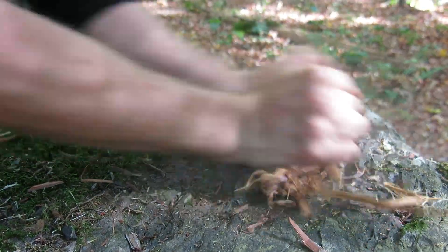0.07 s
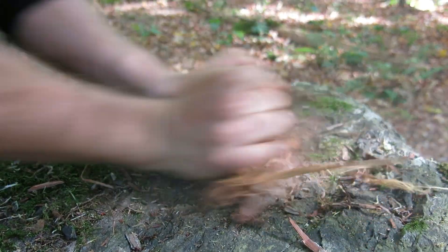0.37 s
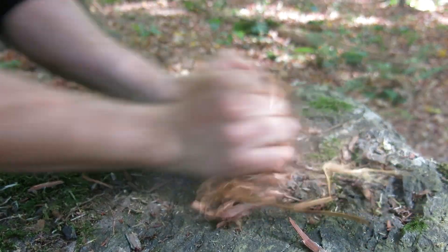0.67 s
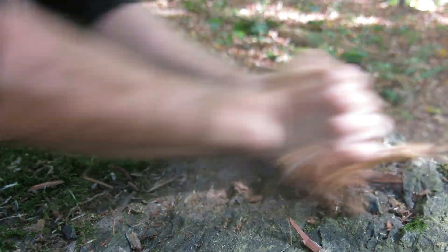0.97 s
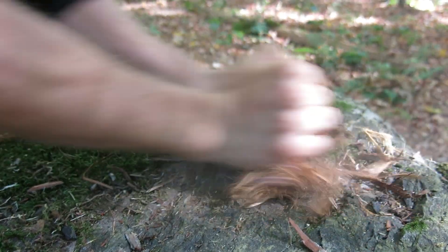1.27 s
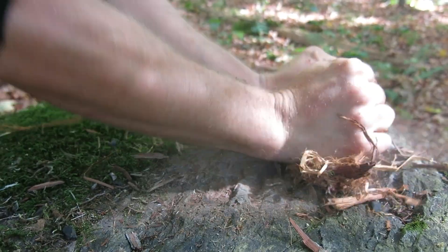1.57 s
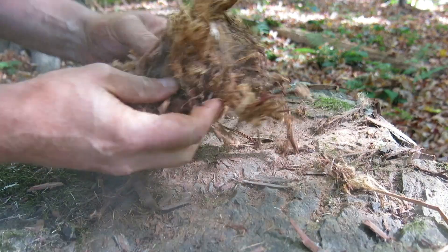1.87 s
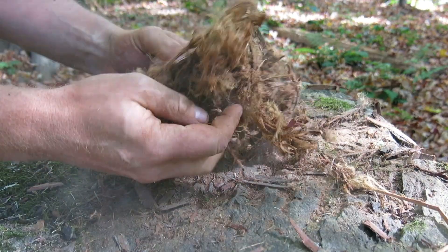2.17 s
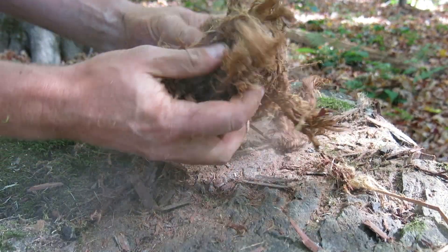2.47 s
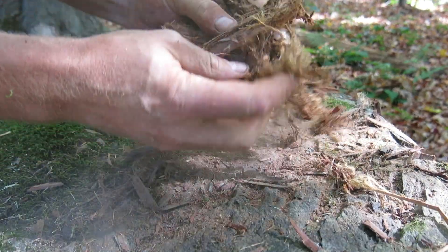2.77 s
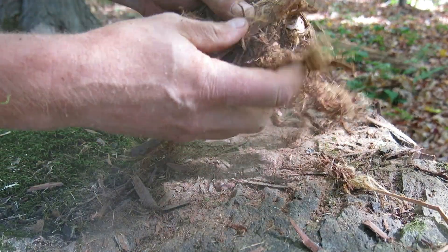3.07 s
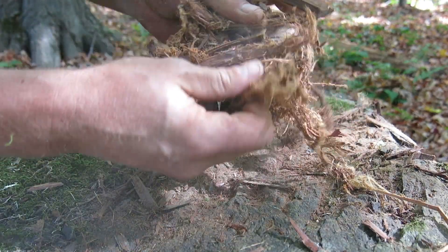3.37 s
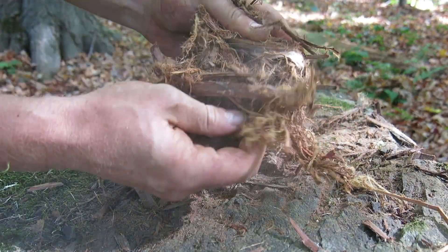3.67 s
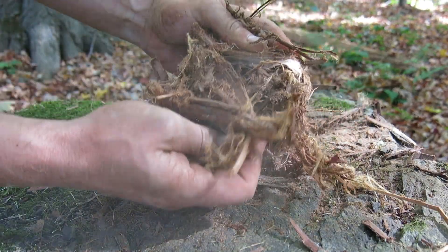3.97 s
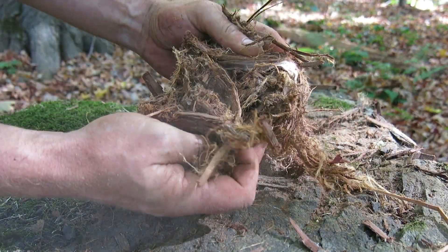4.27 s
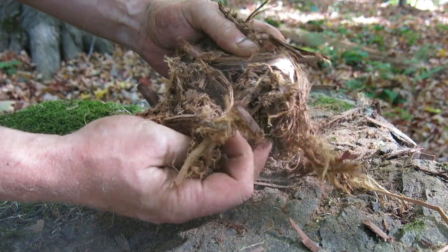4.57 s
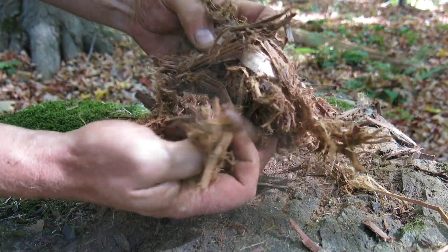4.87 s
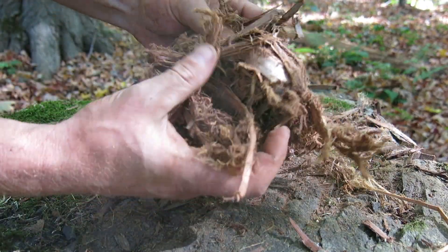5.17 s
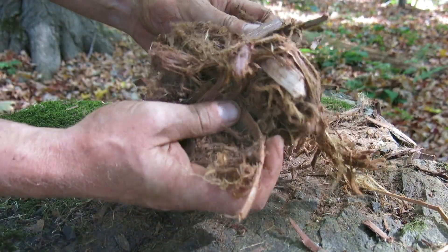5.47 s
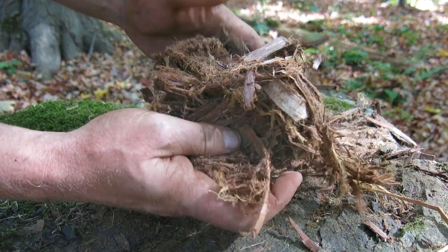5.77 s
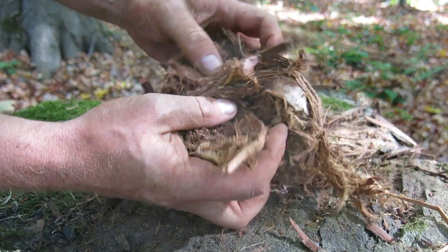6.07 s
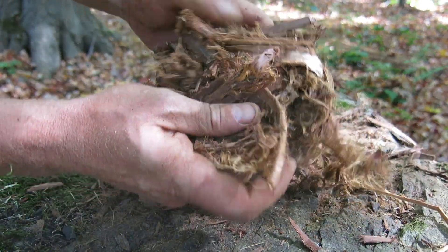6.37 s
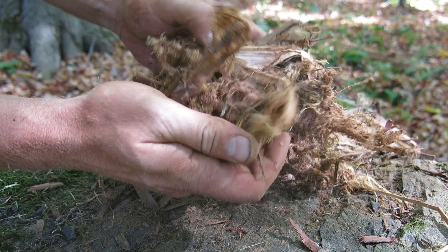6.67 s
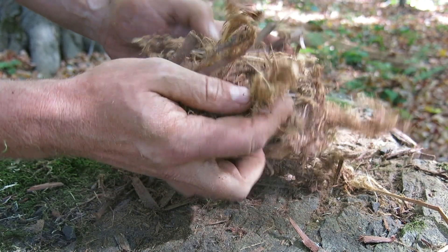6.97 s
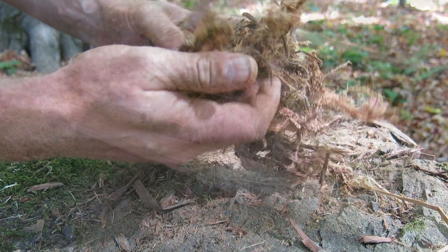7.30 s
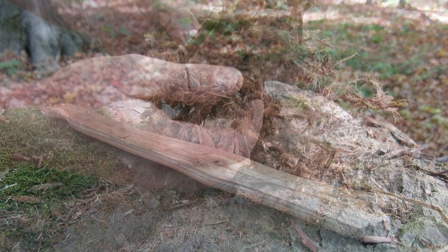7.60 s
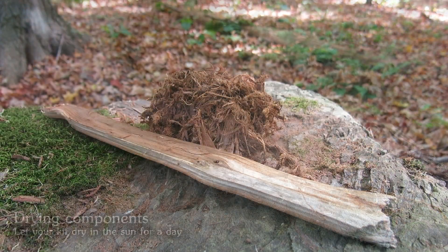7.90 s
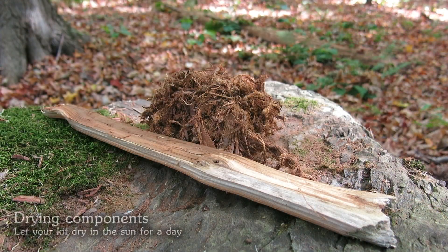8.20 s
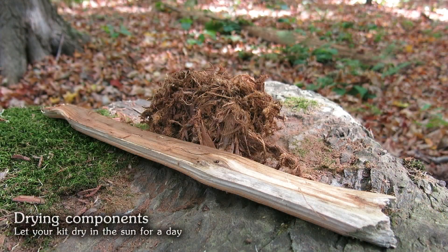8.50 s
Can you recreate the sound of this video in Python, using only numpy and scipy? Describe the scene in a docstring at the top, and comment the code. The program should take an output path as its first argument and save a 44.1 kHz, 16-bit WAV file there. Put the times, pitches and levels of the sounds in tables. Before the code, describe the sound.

Fists scrub dry bark hard against a log, then fingers tease the crackling fibres apart under a distant aircraft-like roar in a forest.

```python
"""Dry bark rasps to and fro on a log, scrubbed by two fists four times a second, and strands snap.
Stick-slip friction excites the wood and the fibres; each fracture radiates a short pulse.
The scene changes abruptly: hands tease the loosened fibres apart in a fine crackle under a distant roar,
like an aircraft drawing away. This fades out, and the quiet forest fades in with a faint far hum."""
import sys
import numpy as np
from scipy import signal
from scipy.fft import rfft, irfft, next_fast_len
from scipy.io import wavfile
from scipy.ndimage import map_coordinates

SR = 44100
rng = np.random.default_rng(int(sys.argv[2]) if len(sys.argv) > 2 else 0)


def master_out(mix):
    """Clip the mix to full scale and print it as 16-bit PCM to the path in sys.argv[1]."""
    frames = np.transpose(np.atleast_2d(mix))
    ceiling = np.clip(frames, -1, 1)
    pcm = np.round(ceiling * 32767).astype(np.int16)
    wavfile.write(sys.argv[1], SR, pcm)


N = 376613
TEASING_START_S, STILLNESS_START_S = 1.621, 7.702

# Spectra of the noise sources. Each row: frequency in Hz, relative spectral density in dB.
FOREST_SPECTRUM = [(24, -36), (45, -12), (75, 0), (194, -0.5), (276, -5), (770, -11), (2000, -14.5),
                   (3000, -18), (7000, -21), (16000, -32.5)]
STILL_AIR_SPECTRUM = [(18, -62), (30, -32), (60, -11), (112, -5), (165, -10), (266, -10.5), (328, -16),
                      (449, -13), (512, -16), (632, -16), (1040, -19.5), (1600, -23), (3000, -33),
                      (7000, -39), (16000, -54.5)]
RUMBLE_SPECTRUM = [(13, -50), (22, -28), (32, -26.5), (61, -7), (76, -5.5), (114, -4), (178, -3),
                   (304, -9.5), (500, -14.5), (650, -37), (1100, -120)]
RUSH_SPECTRUM = [(180, -16), (300, -6), (337, -6), (425, -8), (519, -4), (565, -4.5), (614, -4), (814, -4),
                 (978, -5), (1900, -11.5), (2700, -17.5), (4670, -21), (15200, -33), (16000, -33)]
FIBRE_SPECTRUM = [(1650, -14), (2800, -9.5), (3310, -9), (4150, 0.5), (9130, -2), (15200, -7), (16000, -20)]
THUD_SPECTRUM = [(26, -42.5), (45, -18.5), (70, -4), (172, 4.5), (317, -1), (480, 0.5), (700, -6.5),
                 (910, -29.5), (1540, -120)]
LOG_SPECTRUM = [(260, -40), (450, -9.5), (621, -12), (1000, -0.5), (1200, -5.5), (1340, -5.5), (1620, -6.5),
                (1780, -9.5), (2060, -8.5), (2350, -8), (2820, -18), (3600, -15), (4680, -44.5),
                (7920, -120)]
RASP_SPECTRUM = [(1530, -32), (2600, -4.5), (5350, -6), (6620, -3.5), (8200, -7), (10900, -7.5),
                 (14500, -12.5), (15300, -16.5), (16000, -22)]
# Partials of the far hum. Each row: frequency in Hz, mean level in dB.
HUM_PARTIALS = [(113.0, -73), (226.1, -67)]
# The deep drone in the roar. Each row: time in seconds, pitch in Hz, level in dB relative to the rush.
DRONE_TRACK = [(1.62, 78.2, 0), (1.9, 76.8, -7.5), (2.6, 76, -7), (3.7, 82, -3), (4.3, 76, -5),
               (5.3, 79, -2.5), (6.2, 85.1, -8), (7.2, 92.1, -5.5)]
# Long soft swells of noise, each in one band. Each row: crest and length in seconds, level in dB, centre and
# width in Hz.
LONG_SWELLS = [(2.8, .6, -56.5, 3600, 2200), (2.821, 0.71, -48, 1580, 500), (4.57, 0.5, -51.5, 700, 700),
               (4.622, 0.65, -54.5, 11800, 5430), (4.647, 0.7, -59.5, 4500, 1200),
               (4.52, 0.63, -59, 2380, 400), (5.67, .8, -58, 1570, 450), (5.75, 0.56, -66, 3930, 700)]
# Loose fibres shifting ever more lightly. Each row: time in seconds, relative level in dB.
RUSTLE_LEVELS = [(1.63, -46.5), (2.05, -50), (2.25, -54), (2.8, -52.5), (3.95, -65.5), (5.1, -59),
                 (6.0, -65.5), (7.28, -63), (7.5, -88)]
# Pulls of the fingers through the wad. Each row: crest and length in seconds, relative level in dB.
FINGER_PULLS = [(2.483, 0.21, -51.5), (3.257, 0.36, -52), (3.57, 0.18, -55), (4.85, .05, -53.5),
                (4.9, 0.051, -54.5), (5.14, .06, -58.5), (5.307, .08, -52), (5.47, .08, -64),
                (5.678, .07, -62), (6.16, .04, -49), (6.452, .04, -62), (6.52, .05, -60),
                (6.69, .05, -59.5), (7.22, .1, -57.5)]
# Breaking strands. Each row: start in seconds, pulse level in dB, pitch in Hz, knock level in dB.
STRAND_SNAPS = [(0.0616, -13, 3925, -17.5), (0.1155, -10.5, 6175, -37), (0.1383, -13, 1840, -22.5),
                (0.1905, -10.5, 5025, -22), (0.241, -14.5, 2206, -20.5), (0.255, -6, 5574, -14),
                (0.4449, -7, 5250, -31.5), (0.4888, -5, 6110, -17.5), (0.5567, -14.5, 5944, -30.5),
                (0.7738, -3.5, 2060, -11), (0.784, -2, 7850, -27), (1.0219, -15.5, 3920, -30.5),
                (1.1317, -10, 4000, -25.5), (1.209, -16, 1370, -20), (1.3015, -17, 3060, -21),
                (1.3122, -19, 1098, -20.5), (1.4608, -3.5, 4400, -33.5), (1.4618, -5, 3990, -31),
                (1.4627, -7, 3310, -27.5), (1.4899, -16, 11000, -20.5), (1.512, -18, 1255, -21),
                (2.1407, -30.5, 5000, -36), (4.9018, -40, 5490, -54), (5.1434, -39.5, 7300, -43),
                (5.3178, -34, 9900, -54), (5.439, -33, 4360, -33), (5.565, -32.5, 4920, -31),
                (6.1626, -36.5, 8450, -57)]
# Pushes and pulls in turn. Each row: start, crest and end in seconds, relative levels of thud, log
# and rasp in dB, resonance of the hollow under the hands in Hz.
SCRUB_STROKES = [(-0.06, 0.025, 0.12, -35, -26, -30, 994), (0.072, 0.192, 0.22, -30, -28.5, -30.5, 1084),
                 (0.203, 0.257, 0.37, -43.5, -26.5, -31.5, 1194),
                 (0.297, 0.437, 0.465, -37, -33.5, -35, 1000), (0.443, 0.519, 0.6, -38.5, -22.5, -30, 1053),
                 (0.556, 0.67, 0.68, -33, -30, -34, 996), (0.658, 0.759, 0.82, -34, -21.5, -30, 1060),
                 (0.774, 0.896, 0.93, -36, -34.0, -34.5, 1107),
                 (0.903, 0.988, 1.074, -36.5, -25.5, -34, 1020), (1.033, 1.139, 1.164, -35, -33, -33, 700),
                 (1.154, 1.219, 1.28, -35.5, -29.5, -34, 1070), (1.213, 1.378, 1.402, -38, -33.5, -38, 865),
                 (1.395, 1.455, 1.554, -34, -23.5, -29.5, 799)]
# Likeness of left and right. Each row: frequency in Hz, coherence from -1 to 1.
NEAR_COHERENCE = [(60, 0.52), (120, 0.44), (240, 0.89), (480, 0.14), (950, 0.79), (1890, 0.97),
                  (3770, 0.94), (7520, 0.72), (15000, 0.26)]
FAR_COHERENCE = [(60, 0.63), (130, 0.42), (290, -0.2), (640, 0.01), (1410, 0.25), (3100, 0.6), (6820, 0.29),
                 (15000, 0.42)]
# Unequal colour of the two microphones. Each row: frequency in Hz, left minus right in dB.
MIC_IMBALANCE = [(60, 0.5), (110, 1.5), (380, 0.5), (700, 0.3), (1290, 1.5), (2380, 0), (4400, 0.9),
                 (8120, -2), (15000, 4)]


def amp(db):
    """Amplitude grows tenfold for every 20 dB."""
    return 10 ** (np.asarray(db) / 20)


def unit(x):
    """Normalisation to an rms of 1."""
    return x / np.sqrt(np.mean(x ** 2) + 1e-20)


def clock():
    """The time of every sample in seconds."""
    return np.arange(N) / SR


def along(points, hz):
    """Interpolation of (Hz, value) points on a logarithmic frequency axis."""
    knots_hz, values = np.transpose(points)
    return np.interp(np.log(hz + 1), np.log(knots_hz + 1), values)


def curves(rows):
    """Linear interpolation in time of each column after the first."""
    times, *columns = np.transpose(rows)
    return [np.interp(clock(), times, column) for column in columns]


def wobble(rate):
    """Smooth random modulation with rate knots a second."""
    return map_coordinates(rng.standard_normal(int(N * rate / SR) + 4), [clock() * rate])


def filtered(x, response):
    """Linear filtering multiplies the spectrum by a frequency response."""
    size = next_fast_len(N + 8192)
    return irfft(rfft(x, size) * response(np.fft.rfftfreq(size, 1 / SR)), size)[..., :N]


def placed(pair, spectrum, coherence):
    """Partial coherence: two independent signals are coloured, then added and subtracted; rms 1."""
    def response(hz):
        angle = np.arccos(np.clip(along(coherence, hz), -1, 1)) / 2
        return amp(along(spectrum, hz)) * np.array([np.cos(angle), np.sin(angle)])
    mid, side = filtered(pair, response)
    return unit(np.array([mid + side, mid - side]))


def noise():
    """Two independent channels of white noise."""
    return rng.standard_normal((2, N))


def slips(rate, spread_db, smooth):
    """Stick-slip friction: rate uneven catches a second over a share of smooth sliding noise."""
    size = amp(spread_db * np.clip(rng.standard_normal(N), -2, 2))
    catches = (rng.random(N) < rate / SR) * size * rng.choice([-1, 1], (2, N))
    return unit(catches) + smooth * noise()


def patchy(pair, depth_db, width_hz, life_s):
    """Short-lived resonances act as a random gain, smooth over width_hz and life_s."""
    spectra = signal.stft(pair, nperseg=512)[2]
    frame_times = np.arange(spectra.shape[2]) * 256 / SR
    hz, t = np.meshgrid(np.fft.rfftfreq(512, 1 / SR), frame_times, indexing="ij")
    field = map_coordinates(rng.standard_normal((200, 600)), [hz / width_hz, t / life_s], mode="wrap")
    return signal.istft(spectra * amp(depth_db * field), nperseg=512)[1][:, :N]


def gesture(crest, length, rise=.45):
    """A finger accelerates for the share rise of its movement, crests at speed 1 and slows."""
    times = [crest - rise * length, crest, crest + (1 - rise) * length]
    return np.sin(np.pi * np.interp(clock(), times, [0, .5, 1]))


def forest():
    """Forest air is stationary noise, strongest in the bass."""
    return amp(-47) * placed(noise(), FOREST_SPECTRUM, FAR_COHERENCE)


def stillness():
    """Stiller air carries a far hum: two partials, slowly modulated in amplitude and phase."""
    drift = .5 * wobble(6.2)
    hum = sum(amp(db + 2.5 * wobble(4)) * np.sqrt(2) * np.sin(2 * np.pi * hz * clock() + drift)
              for hz, db in HUM_PARTIALS)
    return amp(-55.5) * placed(noise(), STILL_AIR_SPECTRUM, FAR_COHERENCE) + hum


def roar(nearest_s=2.015, pass_s=1.5):
    """Spherical spreading: a far engine's sound falls inversely with distance and wavers in the air."""
    hz, drone_db = curves(DRONE_TRACK)
    distance = np.hypot(1, (clock() - nearest_s) / pass_s)  # in multiples of the nearest distance
    rush = placed(noise(), RUSH_SPECTRUM, FAR_COHERENCE)
    rumble = amp(-.45) * placed(noise(), RUMBLE_SPECTRUM, FAR_COHERENCE)
    phase = 2 * np.pi * np.cumsum(hz) / SR
    mid, side = (unit(wobble(18) * np.sin(phase) + wobble(18) * np.cos(phase)) for _ in range(2))
    drone = amp(drone_db) * (mid + .4 * side * np.array([[1], [-1]]))
    return amp(-42 + .5 * wobble(7)) / distance * (rush + rumble + drone)


def long_swells():
    """Band-limited noise: long soft swells rise and fall beneath the crackle, each gathered in one band."""
    out = np.zeros((2, N))
    for crest, length, db, centre_hz, width_hz in LONG_SWELLS:
        catches = slips(rate=600, spread_db=3, smooth=.82)
        mid, side = filtered(catches, lambda hz: 1 / (1 + np.abs(2 * (hz - centre_hz) / width_hz) ** 2.6))
        out += amp(db) * gesture(crest, length) * unit(np.array([mid + .65 * side, mid - .65 * side]))
    return out


def teasing(thin_hz=6500, thin_db_per_s=1.5, neutral_s=3.1):
    """Incoherent sources add in power: brushing fibres crackle more with each pull; stray ones flick."""
    rustle_db, = curves(RUSTLE_LEVELS)
    pull_power = sum((amp(db) * gesture(crest, length)) ** 2 for crest, length, db in FINGER_PULLS)
    envelope = np.sqrt(amp(rustle_db) ** 2 + pull_power)
    friction = patchy(slips(rate=1300, spread_db=2.5, smooth=1), depth_db=2, width_hz=500, life_s=.04)
    crackle = placed(friction, FIBRE_SPECTRUM, FAR_COHERENCE)
    flicks = amp(-12.5) * placed(slips(rate=14, spread_db=4.5, smooth=0), FIBRE_SPECTRUM, FAR_COHERENCE)
    rustle = envelope * amp(1.1 * wobble(26)) * (crackle + flicks)
    # As the wad loosens, finer fibres are left and the lower band dies away.
    low_band = filtered(rustle, lambda hz: 1 / (1 + (hz / thin_hz) ** 4))
    low_gain = amp(-thin_db_per_s * (clock() - neutral_s))
    return rustle + low_band * (low_gain - 1)


def grit(rate, centre_hz, spread_db, decay_cycles=5):
    """Damped vibration: each crumb of bark ticks for a few cycles at its own pitch and place."""
    t = np.arange(SR // 200) / SR
    when, pitch, size, pan = rng.random((int(rate * TEASING_START_S), 4)).T
    hz = centre_hz * 2 ** (2 * pitch[:, None] - 1)
    level_db = -60 * t * hz / decay_cycles - spread_db * np.log(size[:, None] + .055)
    ticks = np.sin(2 * np.pi * hz * t) * amp(level_db)
    onsets = (when * TEASING_START_S * SR).astype(int)
    samples = (onsets[:, None] + np.arange(len(t))).ravel()
    pair = [np.bincount(samples, (ticks * (.5 + share[:, None])).ravel(), N)[:N]
            for share in (pan, 1 - pan)]
    return unit(np.array(pair))


def snaps(rise_cycles=.36, splinter_t60_s=.009, knock_hz=1400, knock_t60_s=.0065):
    """Brittle fracture: a strand kicks for about one cycle and knocks the wood; splinters crackle."""
    t = np.arange(SR // 40) / SR
    out = np.zeros((2, N + SR))
    knock = np.sin(2 * np.pi * knock_hz * t) * amp(-60 * t / knock_t60_s)
    for start, db, hz, knock_db in STRAND_SNAPS:
        age = t * hz / rise_cycles
        pulse = np.sin(2 * np.pi * hz * t) * age * np.exp(1 - age)
        band = signal.butter(1, np.clip([hz / 2, hz * 1.4], 100, SR * .45), "band", fs=SR)
        mid, side = signal.lfilter(*band, rng.standard_normal((2, len(t))))
        splinters = unit(np.array([mid + .43 * side, mid - .4 * side]))
        splinters *= amp(-14 - 60 * t / splinter_t60_s)
        out[:, round(start * SR):][:, :len(t)] += amp(db) * (pulse + splinters) + amp(knock_db) * knock
    # The snaps carry no deep bass.
    return signal.lfilter(*signal.butter(1, 350, "high", fs=SR), out[:, :N])


def scrubbing(depth_db=25, steepness=1.6, hollow_q=3.5):
    """Forced vibration: friction thuds on the log, drives it near 1 kHz and rasps, rising with speed."""
    span = 2 * SR
    t = clock()[:span]
    thud = amp([[0], [-4]]) * placed(noise(), THUD_SPECTRUM, NEAR_COHERENCE)  # to the listener's left
    on_log = patchy(slips(rate=3000, spread_db=4.5, smooth=.75), depth_db=2.5, width_hz=200, life_s=.04)
    log = placed(on_log, LOG_SPECTRUM, NEAR_COHERENCE)[:, :span]
    on_bark = patchy(slips(rate=4000, spread_db=7.5, smooth=.83), depth_db=3, width_hz=380, life_s=.02)
    rasp = amp(1) * placed(on_bark, RASP_SPECTRUM, NEAR_COHERENCE)
    rasp += amp(-9.5) * grit(rate=600, centre_hz=3400, spread_db=3)
    out = np.zeros((2, N))
    for start, crest, end, thud_db, log_db, rasp_db, hollow_hz in SCRUB_STROKES:
        speed = np.sin(np.pi * np.interp(t, [start, crest, end], [0, .5, 1])) ** 2
        swell = amp(-depth_db * (1 - speed) ** steepness) - amp(-depth_db)
        # The hollow between fists and log changes shape with every stroke.
        hollow = signal.lfilter(*signal.iirpeak(hollow_hz, hollow_q, SR), log)
        wood = unit(log + amp(-11) * hollow)
        stroke = amp(thud_db) * thud[:, :span] + amp(log_db) * wood + amp(rasp_db) * rasp[:, :span]
        out[:, :span] += swell * stroke
    # The wad judders over the ridges of the log.
    return out * amp(1.3 * wobble(130))


def scene(fade_out_s=1.72, fade_in_s=.72, floor=.035):
    """Superposition in three scenes: scrubbing, abruptly teasing, then linear fades into stillness."""
    t = clock()
    while_teasing = (t > TEASING_START_S) & (t < STILLNESS_START_S)
    fade_out = while_teasing * np.clip(floor + (STILLNESS_START_S - t) / fade_out_s, 0, 1)
    fade_in = (t >= STILLNESS_START_S) * np.clip(floor + (t - STILLNESS_START_S) / fade_in_s, 0, 1)
    return (scrubbing() + snaps() + (t <= TEASING_START_S) * forest()
            + fade_out * (teasing() + long_swells() + roar())
            + fade_in * stillness())


def record(dry):
    """Two microphones differ a little in frequency response and pass nothing above 16 kHz."""
    return filtered(dry, lambda hz: amp(along(MIC_IMBALANCE, hz) * np.array([[.5], [-.5]])) * (hz < 16000))


dry = scene()
out = record(dry)
master_out(out)
```